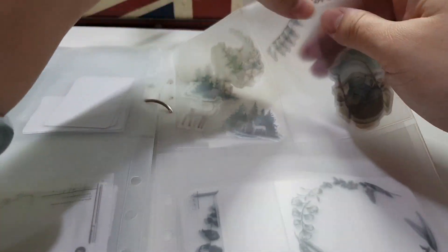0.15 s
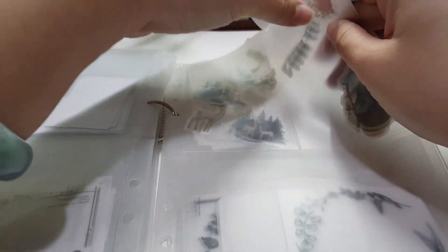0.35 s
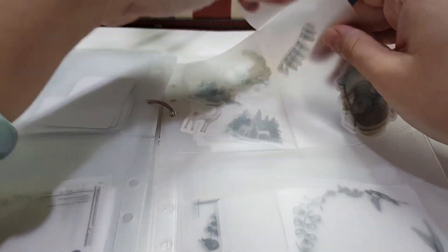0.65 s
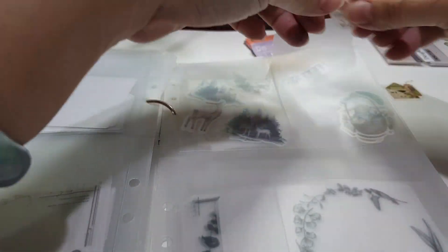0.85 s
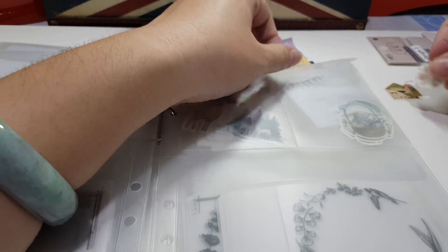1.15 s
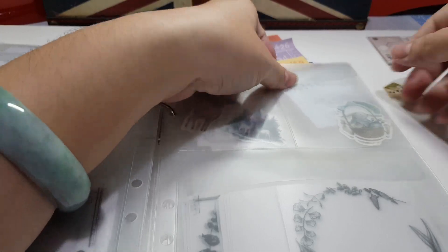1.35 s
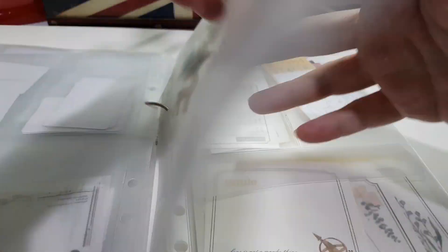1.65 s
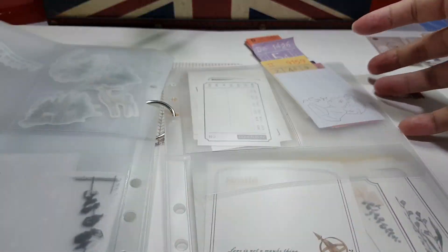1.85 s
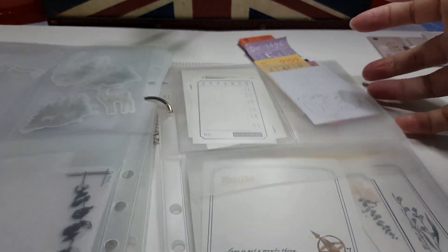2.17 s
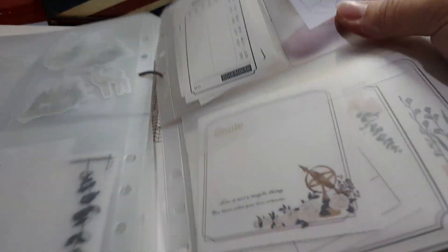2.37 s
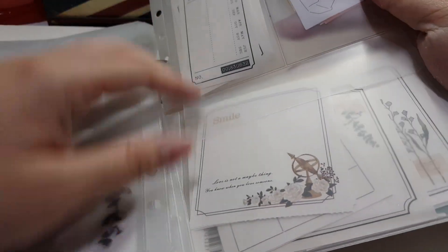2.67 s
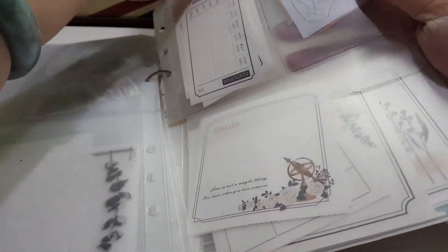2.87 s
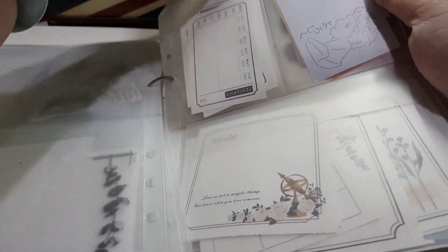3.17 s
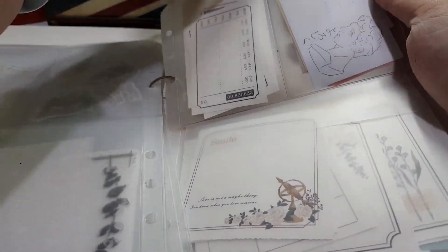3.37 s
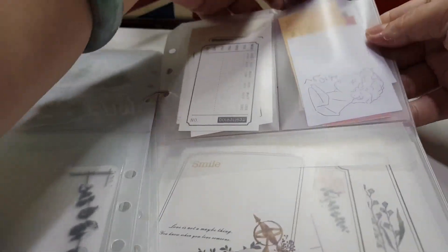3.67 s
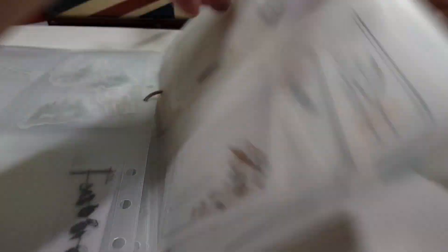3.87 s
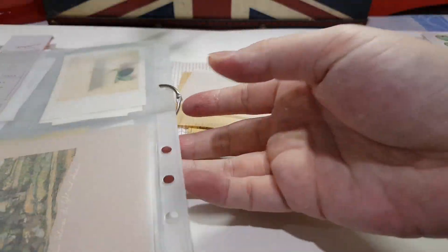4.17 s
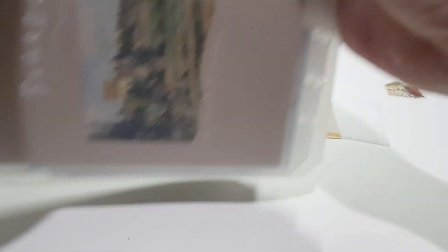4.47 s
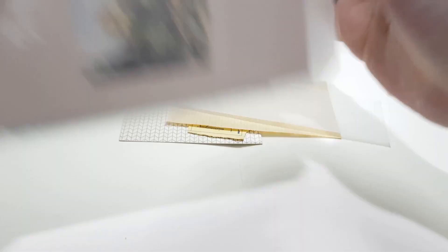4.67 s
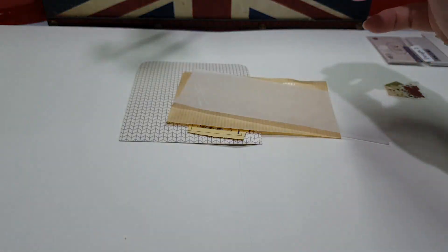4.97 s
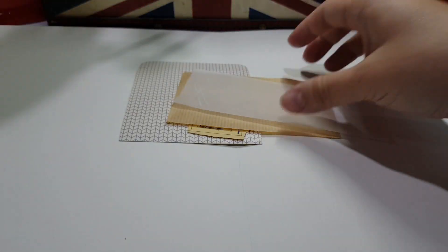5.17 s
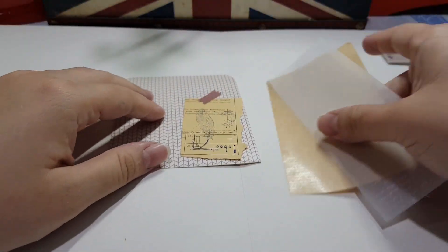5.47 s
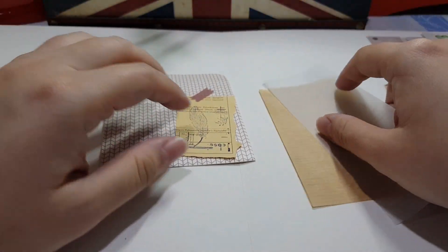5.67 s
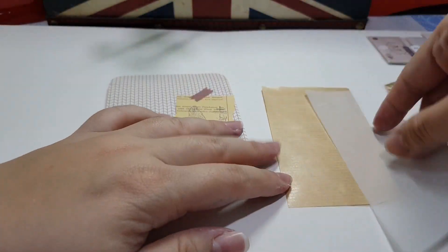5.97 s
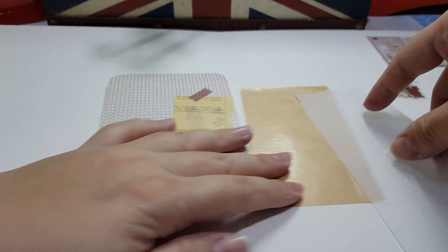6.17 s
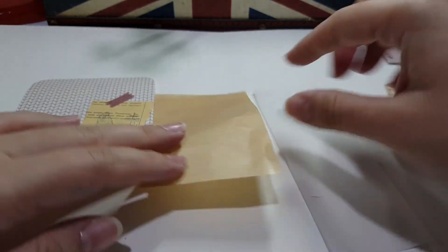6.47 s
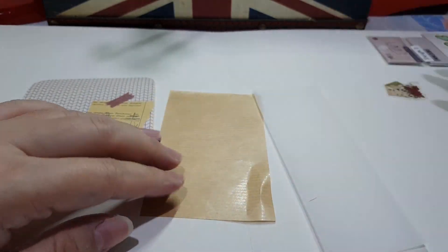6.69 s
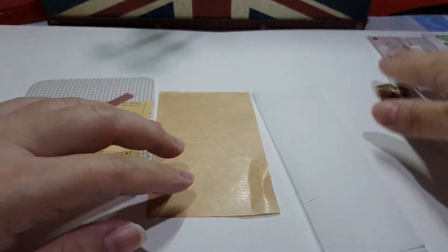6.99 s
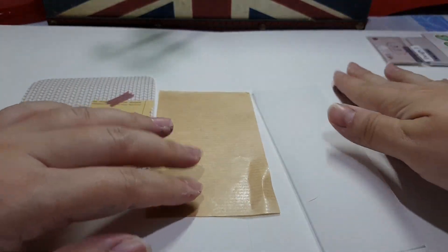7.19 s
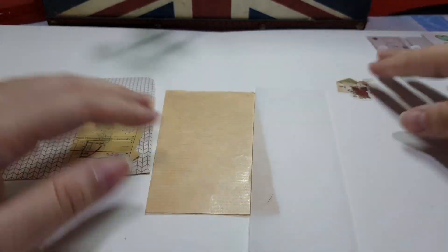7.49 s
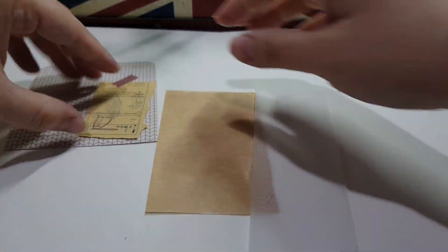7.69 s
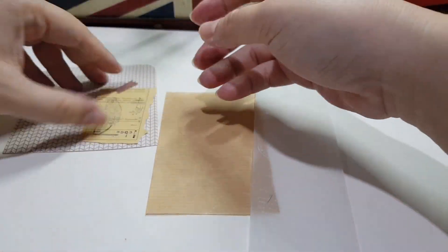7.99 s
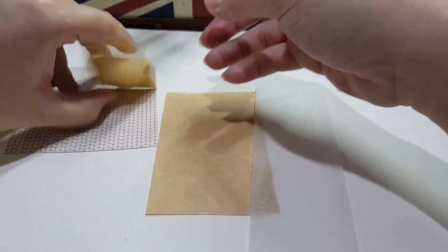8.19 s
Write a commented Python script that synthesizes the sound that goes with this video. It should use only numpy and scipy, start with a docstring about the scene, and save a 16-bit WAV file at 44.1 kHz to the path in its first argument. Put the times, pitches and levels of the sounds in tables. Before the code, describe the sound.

In a small quiet room, close stereo microphones catch hands fingering and turning plastic binder sleeves: crinkles, hollow sweeps and small snaps. The binder is set down with a sharp clack and light bump. Sticker papers then slide and flex with smooth hisses, a hand knocks the desk dully, and bright sharp crackles end it. A low hum pulses steadily beneath.

```python
"""At a desk in a small quiet room, hands leaf through the plastic sleeves of a ring binder,
lay it aside and slide sticker papers about. Noise and tiny random slips make the hisses and crackles.
Bent sheets swell until their stiff edges snap: a crack and a shiver, coloured by the sheet.
Once a hand knocks the desk, which judders: its modes ring as fading sine waves, with a scuff of noise.
Room noise lies underneath, and a low hum of wavering tones and filtered noise swells and sinks."""
import sys
import numpy as np
from scipy import signal
from scipy.fft import rfft, irfft
from scipy.io import wavfile
from scipy.ndimage import map_coordinates

SR = 44100
rng = np.random.default_rng(int(sys.argv[2]) if len(sys.argv) > 2 else 0)


def transcribe(u):
    """Save the signal u as a 16-bit wav file named by the first command-line argument.

    u: samples, shape (n,) or (channels, n), limited to [-1, 1]; the rate is SR.
    q: integer samples, one column per channel.
    """
    v = np.clip(np.atleast_2d(u).T, -1, 1)
    q = np.round(v * 32767).astype(np.int16)
    wavfile.write(sys.argv[1], SR, q)


N = 367794


def gain_of(db):
    """Turns decibels into amplitude."""
    return 10 ** (np.asarray(db) / 20)


def evened(x):
    """Scales a signal to an average strength (rms) of 1."""
    return x / np.sqrt(np.mean(x ** 2) + 1e-20)


def fading(t, t60):
    """Dies away by 60 dB in t60 seconds."""
    return 1000 ** (-t / t60)


def read(points, hz):
    """Reads a table of values over pitch, on a log-frequency axis."""
    f, value = np.transpose(points)
    return np.interp(np.log(hz + 1), np.log(f + 1), value)


def add(mix, s, sound):
    """Mixes a stereo sound in at time s."""
    part = mix[:, max(round(s * SR), 0):][:, :sound.shape[1]]
    part += sound[:, :part.shape[1]]


def wander(size, span):
    """Smooth random drift of rms about 1 that changes over about span points."""
    grid = np.arange(size) / max(span, 1)
    return 1.2 * np.interp(grid, np.arange(size + 2), rng.standard_normal(size + 2))


def band(x, low_hz, high_hz, order):
    """Keeps only what lies between two pitches."""
    return signal.sosfilt(signal.butter(order, [low_hz, high_hz], "band", fs=SR, output="sos"), x)


# How alike the left and right sounds are. Each row: pitch in Hz, likeness from 0 to 1.
LIKENESS = [(60, 1), (250, 0.49), (600, 0.11), (1200, 0.24), (3000, 0.011)]


def paired(z, hz):
    """Two microphones hear the bass alike and the treble differently."""
    same = np.clip(read(LIKENESS, hz), 0, 1)
    return np.array([z[0], same * z[0] + np.sqrt(1 - same ** 2) * z[1]])


def panned(db):
    """Left and right gains of equal total power; db is how much louder the left is."""
    sides = gain_of([[db / 2], [-db / 2]])
    return evened(sides)


def causal(gain):
    """Gives a spectrum the phase of a struck thing: sharp start, then ringing."""
    circle = np.log(np.maximum(np.r_[gain, gain[-2:0:-1]], 1e-6))
    phase = signal.hilbert(circle).imag[:len(gain)]
    return gain * np.exp(-1j * phase)


def flex(hz, centre_hz, octaves=0.6, bounce=0.1, bounce_s=0.000929, spacing_hz=260):
    """A bent sheet rings in one broad hump of modes; its echo off the desk ripples the hump."""
    hump = (1 + (np.log2((hz + 1) / centre_hz) / octaves) ** 2) ** -1.5
    uneven = evened(gain_of(2.1 * wander(len(hz), spacing_hz / hz[1])))  # random bumps along the hump
    echo = abs(1 + np.clip(bounce, 0, .6) * np.exp(-2j * np.pi * hz * bounce_s))
    return hump * uneven * echo


def crackle(size, per_s, spread_db):
    """Tiny slips of random size, with separate random signs at each microphone; rms near 1."""
    sizes = gain_of(spread_db * np.minimum(rng.exponential(1, size), 4))
    slips = (rng.random(size) < per_s / SR) * sizes
    return evened(slips * rng.choice([-1, 1], (2, size)))


def gritty(size, share, per_s):
    """Blends smooth noise with crackle; share is the crackle's part of the power, 0 to 1."""
    share = np.clip(share, 0, 1)
    smooth = np.sqrt(1 - share) * rng.standard_normal((2, size))
    return smooth + np.sqrt(share) * crackle(size, per_s, spread_db=3.5)


# Colour of skin and paper sliding. Each row: pitch in Hz, level in dB.
HISS = [(200, -16.5), (700, -19), (1500, -5.5), (3000, -4.5), (5000, -1), (8000, -3.5), (11500, -1.5),
        (15500, -9.5)]
# Colour of a whole sleeve moving over the desk. Each row: pitch in Hz, level in dB.
BODY = [(60, -17), (200, -10), (450, -10), (700, -9.5), (1100, -1), (2000, -11), (4000, -23), (9000, -57)]


def sheet_colour(hz, flex_db, body_db, flex_hz, octaves=0.6):
    """A sheet's flexing modes joined with the hollow body of its sleeve."""
    return np.hypot(gain_of(flex_db) * flex(hz, flex_hz, octaves), gain_of(body_db + read(BODY, hz)))


def stroke(speed, hiss_db, body_db, flex_db, flex_hz, pan_db, grit, crinkle, flutter_db, octaves):
    """Fine friction hisses; coarser slips drive the sheet's modes and the sleeve's body."""
    size = len(speed)
    hz = np.fft.rfftfreq(size, 1 / SR)
    fine = gritty(size, grit, per_s=2800)
    coarse = gritty(size, crinkle, per_s=1100)
    sheet = sheet_colour(hz, flex_db, body_db, flex_hz, octaves)
    z = rfft(fine) * gain_of(hiss_db + read(HISS, hz)) + rfft(coarse) * causal(sheet)
    flutter = gain_of(flutter_db * wander(size, .006 * SR))
    return irfft(paired(z, hz)) * speed * flutter * panned(pan_db)


def clock(length):
    """Sample times for a sound of at least this length, in whole blocks."""
    return np.arange(1024 * int(length * SR / 1024 + 2)) / SR


def arch(length, shape):
    """Speed of a hand that starts, glides and stops."""
    return np.sin(np.pi * np.minimum(clock(length) / length, 1)).clip(0) ** shape


# The hum swells at a steady pace; the swell just after the knock is turned down with the gain.
HUM_HZ = 46.86
FIRST_CREST_S, SWELL_PERIOD_S, CREST_DB = 0.4247, .838, -48.5
DUCKED_SWELL_S, DUCKED_SWELL_DB = 7.13, -9
# Faint tones of the hum that do not swell. Each row: pitch in Hz, level in dB.
TONES = [(101, -64), (185, -75), (237, -74.5), (288, -81), (339, -77), (403, -78.5), (458, -79.5)]


def hum(rumble=0.34, half_width_s=0.2325, trough_db=-66, balance_db=1.5):
    """A motor's low tone and the flutter around it swell together, under a few faint, wavering tones."""
    t = np.arange(N) / SR
    turn = 2 * np.pi * HUM_HZ * t + 0.465 * wander(N, .15 * SR)
    flutter = band(rng.standard_normal(N), 31, 58, order=3)
    crests = FIRST_CREST_S + SWELL_PERIOD_S * np.arange(N / SR / SWELL_PERIOD_S)
    ducked = abs(crests - DUCKED_SWELL_S) < SWELL_PERIOD_S / 2
    heights = gain_of(CREST_DB + DUCKED_SWELL_DB * ducked)
    swell = sum(height * np.exp(-abs((t - s) / half_width_s) ** 3) for s, height in zip(crests, heights))
    low = evened(evened(np.sin(turn)) + rumble * evened(flutter)) * (swell + gain_of(trough_db))
    buzz = np.zeros(N)
    for hz, db in TONES:
        wavering = t + 0.00083 * wander(N, .13 * SR)
        buzz += gain_of(db) * evened(np.sin(2 * np.pi * hz * wavering))
    return (low + buzz) * panned(balance_db)


# Colour of the room noise. Each row: pitch in Hz, level in dB.
AIR = [(20, -50), (45, -27), (75, -39), (110, -27), (145, -48), (180, -42), (240, -41), (420, -48),
       (650, -57), (1050, -54), (1700, -62), (2800, -82), (8000, -84), (15000, -88)]
# The recorder's automatic gain, typed as a curve: the room noise sinks after the knock and recovers.
# Each row: time in seconds, level change in dB.
AIR_LEVEL = [(0, -0.5), (6.7, -0.5), (6.95, -5.5), (7.55, -7), (7.9, 2.5), (8.34, 1)]


def air():
    """Dull, steady room noise: random hiss shaped to a dark colour, then turned down and up by the gain."""
    hz = np.fft.rfftfreq(N, 1 / SR)
    noise = irfft(paired(rfft(rng.standard_normal((2, N))), hz) * gain_of(read(AIR, hz)), N)
    return noise * gain_of(np.interp(np.arange(N) / SR, *np.transpose(AIR_LEVEL)))


# Fingers fidget with the sleeves between the grips.
# Each row: start in seconds, end in seconds, middle force of the touches in dB.
FIDGETS = [(0, 0.474, -61.5), (1.05, 1.2, -57.5), (3.18, 3.36, -62.5)]


def fidget(start, end, force_db, gap_s=.08, length=0.0455, low_hz=3000, high_hz=7500,
           spread_db=3, hiss_re_db=-16, body_re_db=11):
    """Light touches at loose intervals, each ringing a different small patch of plastic."""
    out = np.zeros((2, round((end - start + .3) * SR)))
    times = np.arange(0, end - start, gap_s)
    for s, (late, force, patch) in zip(times, rng.random((len(times), 3))):
        db = force_db + spread_db * (2 * force - 1)
        patch_hz = low_hz * (high_hz / low_hz) ** patch
        touch = stroke(arch(length, shape=0.82), db + hiss_re_db, db + body_re_db, db, patch_hz,
                       pan_db=1.17, grit=.3, crinkle=0.44, flutter_db=1.5, octaves=0.305)
        add(out, s + late * gap_s / 2, touch)
    return out


# At a firm grip: force, friction hiss and hollow body in dB.
FIRM_DB, FIRM_HISS_DB, FIRM_BODY_DB = -40, -44, -40
# Hiss and body follow the force by their own slopes, in dB per dB.
HISS_SLOPE, BODY_SLOPE = 1.425, 0.407
# Each rustle starts softly, then fades with a faint trail.
LEAD_S, LEAD_DB, GRIP_S = .025, -14.5, 0.0129
TRAIL_DB, TRAIL_S = -21, 0.0385
# A sleeve is gripped or crumpled. Each row: start of the grip in seconds, length of the grip in seconds,
# force in dB, middle pitch of the flexing in Hz, left over right in dB.
RUSTLES = [(0.133, 0.0375, -48.5, 5260, 2.5), (0.228, 0.0386, -63, 5140, 7),
           (0.511, 0.0174, -49, 4700, -2.5), (0.641, 0.0415, -54.5, 2880, 1),
           (0.705, 0.054, -40, 3350, 1.5), (0.775, 0.02855, -39.5, 2710, 0.5),
           (0.993, 0.0257, -41.5, 3900, -0.5), (1.276, 0.0347, -51, 3320, -2.5),
           (1.463, 0.065, -45.5, 4200, -2.5), (1.548, .08, -43, 2100, 2), (1.622, 0.059, -44, 2000, 2),
           (1.694, 0.0646, -42.5, 3330, 1), (1.782, 0.0391, -43, 2930, 5), (2.13, 0.0306, -55, 2400, 4.5),
           (2.187, 0.0362, -49.5, 2840, -1), (2.322, 0.036, -42.5, 2280, 0), (2.951, 0.063, -47.5, 3660, 0),
           (3.414, 0.042, -59.5, 6040, 0), (3.458, 0.0338, -59, 2860, 1), (3.67, 0.0248, -47.5, 2530, -0.5),
           (3.811, 0.0378, -55.5, 2570, 2), (3.938, 0.0445, -41, 2170, 1), (4.001, 0.0512, -39.5, 1960, 2),
           (4.089, 0.0488, -43, 2860, 3.5), (4.162, 0.078, -60.5, 3000, 4), (4.253, 0.063, -43, 1885, 4),
           (4.339, 0.084, -42, 1966, 2), (4.595, 0.0414, -38.5, 2950, 0.5), (4.638, 0.0937, -51, 3050, 2),
           (5.022, 0.0608, -40, 2260, 0.5), (5.278, 0.0172, -47.5, 2500, -0.5),
           (6.464, 0.0195, -43, 6160, -0.5), (6.554, 0.054, -47.5, 4500, 2),
           (6.667, 0.0386, -55, 2385, 1.5), (7.901, 0.0395, -52, 4200, 6), (7.945, 0.0352, -39, 3977, -0.5),
           (7.98, 0.0179, -32, 4500, 4), (8.252, 0.0323, -34, 4350, -0.5)]


def rustle(length, force_db, flex_hz, pan_db, octaves=0.718):
    """Soft start, grip and release; a harder grip is brighter, a light one mostly hollow."""
    t = clock(3 * length + .15) - LEAD_S  # the grip starts at 0
    held = np.maximum(t, 0)
    speed = np.minimum(held / GRIP_S, 1) * np.exp(-(held / length) ** 2.2)
    lead = gain_of(LEAD_DB) * (1 + t / LEAD_S) ** 2
    trail = gain_of(TRAIL_DB) * np.exp(-held / TRAIL_S)
    skirt = np.where(t < 0, lead, trail)
    extra_db = force_db - FIRM_DB
    hiss_db = FIRM_HISS_DB + HISS_SLOPE * extra_db
    body_db = FIRM_BODY_DB + BODY_SLOPE * extra_db
    return stroke(np.hypot(speed, skirt), hiss_db, body_db, force_db, flex_hz, pan_db,
                  grit=.16, crinkle=0.32, flutter_db=2.0, octaves=octaves)


# A whole sleeve sweeps over the desk.
# Each row: start in seconds, length in seconds, body level in dB, left over right in dB.
SWEEPS = [(.22, 0.0507, -38.5, 2), (.505, 0.0801, -39.5, 3), (1.45, 0.0998, -38.5, 0),
          (1.63, .13, -33, 3.5), (4.59, 0.0512, -26, 0), (5.04, 0.1091, -32, 3)]


def sweep(length, body_db, pan_db, hiss_re_db=-33, flex_re_db=-15, flex_hz=2300):
    """A moving sleeve sounds mostly with its hollow body."""
    return stroke(arch(length, shape=0.692), body_db + hiss_re_db, body_db, body_db + flex_re_db,
                  flex_hz, pan_db, grit=.12, crinkle=0.33, flutter_db=2.5, octaves=0.65)


# A tauter edge snaps with more fizz: hiss against flex at FIZZ_HZ, and its rise with pitch.
FIZZ_HZ, FIZZ_DB, FIZZ_DB_PER_OCTAVE = 4080, -12, 16.5
# Sheet edges that snap or tap. Each row: start in seconds, time to fade by 60 dB in seconds,
# sheet flex in dB, hollow body in dB, middle pitch of the flexing in Hz, left over right in dB.
SNAPS = [(.707, 0.0315, -19, -11, 3300, 7), (.997, 0.016, -16, -13, 4520, 2.5),
         (1.279, 0.0233, -23, -15.5, 3900, 1.5), (1.4773, 0.01, -4, 0, 3730, 1),
         (1.4947, 0.0072, -8.5, -16.5, 3880, -1), (1.5141, 0.0075, -13.5, -17.5, 1800, 6.5),
         (1.5764, 0.0108, -13, -26.5, 5780, -2.5), (1.6676, 0.02, -18.5, -3, 4260, 10),
         (1.707, 0.033, -11.5, -7, 5940, -1.5), (1.9699, 0.041, -23.5, -16.5, 2625, -2.5),
         (2.4771, 0.0223, -20.5, -12, 4200, 7), (4.0154, 0.0092, -6, -18.5, 2710, 7.5),
         (4.6019, 0.0082, 1.5, -6, 2736, 22), (4.6214, 0.0118, -3.5, -3, 3000, 9),
         (4.7444, 0.0147, -9, -4.5, 2030, 5), (4.7618, 0.0063, -12, -9, 2065, 5.5),
         (5.0352, 0.0122, -5.5, -7.5, 2290, 3), (5.274, 0.035, -13, -27, 2300, -2),
         (5.3688, 0.015, -10.5, -30.5, 5000, -2), (5.459, 0.038, -7, -29, 5400, -1),
         (6.578, 0.0325, -10, -36, 6450, 0), (6.5959, .009, -14.5, -36.5, 7067, 5),
         (7.952, .02, -11.5, -27, 3990, -0.5), (7.996, 0.0255, 4.5, -5.5, 4300, 3.5),
         (8.283, 0.0304, 9.5, 7.5, 4566, 3)]


def snap(t60, flex_db, body_db, flex_hz, pan_db, crack_share=0.15, size=4096):
    """An edge lets go: one crack and a brief shiver of the sheet."""
    t, hz = np.arange(size) / SR, np.fft.rfftfreq(size, 1 / SR)
    hiss_db = flex_db + FIZZ_DB + FIZZ_DB_PER_OCTAVE * np.log2(flex_hz / FIZZ_HZ)
    shiver = rng.standard_normal((2, size)) * fading(t, t60)
    shiver /= np.linalg.norm(shiver, axis=1, keepdims=True)
    crack = 1 / (1 + 1j * hz / 7000)  # the fold takes a moment to flip
    share = np.clip(crack_share, 0, 1)
    blow = np.sqrt(share) * crack + np.sqrt(1 - share) * rfft(shiver)
    sheet = sheet_colour(hz, flex_db, body_db, flex_hz)
    colour = causal(np.hypot(sheet, gain_of(hiss_db + read(HISS, hz))))
    return irfft(paired(blow, hz) * colour) * (1 - t / t[-1]) * panned(pan_db)


# Skin or paper slides flat across a sheet. Each row: start in seconds, length in seconds,
# hiss level in dB, middle pitch of the flexing in Hz, left over right in dB.
SLIDES = [(1.09, 0.1332, -63, 4000, -5.5), (1.83, 0.1205, -59.5, 5000, 1), (2.33, 0.284, -59.5, 2980, 3),
          (2.535, 0.1202, -51, 11000, 4.5), (2.74, 0.058, -66, 11500, 6.5), (2.83, 0.097, -59, 6640, 2),
          (3.535, 0.1083, -52.5, 2800, 2), (3.87, 0.157, -54, 4300, -2), (4.44, 0.1404, -41, 3020, 1),
          (4.782, 0.051, -44.5, 3180, 2), (5.29, 0.2556, -43, 5400, 1), (5.4, 0.2997, -61, 5500, 0.5),
          (5.74, 0.53, -65, 6500, -2.5), (6.035, 0.0598, -51, 7200, 1), (6.11, 0.0513, -51.5, 8100, 1.5),
          (6.205, 0.2096, -44, 3570, 1.5), (7.305, 0.0638, -58, 9040, 0), (7.35, 0.0792, -57, 10400, 0.5),
          (7.625, 0.1301, -51.5, 2000, 2.5)]


def slide(length, hiss_db, flex_hz, pan_db, body_re_db=-7, flex_re_db=-5):
    """A flat slide is nearly all smooth hiss."""
    return stroke(arch(length, shape=1.37), hiss_db, hiss_db + body_re_db, hiss_db + flex_re_db,
                  flex_hz, pan_db, grit=.1, crinkle=0.2, flutter_db=1.5, octaves=0.95)


# A thin high ringing when the binder is moved.
# Each row: start in seconds, length in seconds, level in dB.
RINGING = [(4.085, 0.143, -62), (4.38, 0.1, -61.5), (4.495, 0.087, -52), (4.785, 0.0865, -61)]


def ringing(length, db, pitch_hz=14770, width_hz=130):
    """A narrow, fuzzy whistle that swells and fades."""
    t = np.arange(round(length * SR)) / SR
    turn = 2 * np.pi * pitch_hz * t
    span = SR / width_hz
    sides = [wander(len(t), span) * np.cos(turn) + wander(len(t), span) * np.sin(turn) for side in range(2)]
    return gain_of(db) * np.array(sides) * np.hanning(len(t))


# Ways the desk top rings. Each row: pitch in Hz, level in dB, time to fade by 60 dB in seconds.
DESK = [(116, -20.5, .12), (227.3, -8, 0.098), (252.4, 0.5, 0.081), (315.9, -14, 0.14), (345.3, -4, 0.1),
        (417.2, -17.5, 0.066), (510.7, -10.5, 0.06)]
# Colour of the scuff in each bump. Each row: pitch in Hz, level in dB.
SCUFF = [(60, -12.5), (115, 5), (165, -7.5), (220, 17.5), (400, 15), (630, -4.5), (830, 0.5), (990, 13),
         (1250, -2.5), (2200, -9), (4000, -21), (7000, -33.5), (12000, -48.5)]
# Bumps on the desk, as the binder lands and a hand knocks.
# Each row: start in seconds, strength in dB, scuff level in dB.
BUMPS = [(4.602, -42, -18), (4.621, -36.5, -13.5), (6.811, -25.5, 2.5), (6.8226, -29, 1.5),
         (6.8327, -19, -2), (6.8474, -23.5, 4.5), (6.8559, -17.5, -3)]


def bump(strength_db, scuff_db, scuff_t60=0.109, size=12288):
    """One cushioned bump rings the desk's modes while skin scuffs the top."""
    t, hz = np.arange(size) / SR, np.fft.rfftfreq(size, 1 / SR)
    ring = sum(gain_of(db) * fading(t, t60) * np.sin(2 * np.pi * f * t) for f, db, t60 in DESK)
    soft = band(ring, 105, 500, order=4)
    rub = rng.standard_normal((2, size)) * np.minimum(t / .006, 1) * fading(t, scuff_t60)
    rub /= np.linalg.norm(rub[0])
    scuff = irfft(paired(rfft(rub), hz) * causal(gain_of(read(SCUFF, hz))))
    return gain_of(strength_db) * soft + gain_of(scuff_db) * scuff


# How far a bend swells, how fast it fades once let go (as a share of its length), and how far it climbs.
BEND_SWELL_DB, BEND_RELEASE_SHARE, BEND_CLIMB_OCTAVES = 19.5, 0.206, .18
# A sticker sheet is bent further and further, then let go. Each row: start in seconds,
# seconds until let go, final level in dB, final middle pitch of the flexing in Hz, left over right in dB.
BENDS = [(5.268, 0.0288, -33.5, 2530, -0.5), (5.68, 0.3103, -54.5, 5550, 7.5),
         (6.36, 0.081, -54.5, 6720, 2), (6.52, .075, -37.5, 3270, 5), (7.79, 0.194, -48.5, 3240, 4),
         (8.09, 0.17, -41, 3240, 4)]


def bend(length, flex_db, flex_hz, pan_db, hiss_re_db=-15, body_re_db=-9):
    """A band of the sheet swells and climbs as it is bent taut, and fades once it is let go."""
    done = clock(2 * length) / length  # reaches 1 when let go
    slack, after = np.maximum(1 - done, 0), np.maximum(done - 1, 0)
    swell = np.minimum(10 * done, 1) * gain_of(-BEND_SWELL_DB * slack)
    speed = swell * np.exp(-after / BEND_RELEASE_SHARE)
    taut = stroke(np.ones(len(done)), flex_db + hiss_re_db, flex_db + body_re_db, flex_db, flex_hz, pan_db,
                  grit=.25, crinkle=0.47, flutter_db=3.5, octaves=0.538)
    # playing the taut sound slower at first lowers its pitch
    slowed = np.cumsum(2 ** (-BEND_CLIMB_OCTAVES * slack))
    return speed * np.array([map_coordinates(side, [slowed]) for side in taut])


def room(x, t60=0.1191, wet_db=-17, dull_hz=6000):
    """A short, dull tail from the desk top and the near walls."""
    t = np.arange(SR // 2) / SR
    taps = rng.standard_normal((2, len(t))) * fading(t, t60) * (t > .002)
    tail = signal.lfilter(*signal.butter(1, min(dull_hz, SR / 3), fs=SR), taps)
    tail /= np.linalg.norm(tail[0])
    return gain_of(wet_db) * signal.fftconvolve(x, tail, axes=1)[:, :N]


def scene():
    """All the handling, in the room, over hum and air."""
    hands = np.zeros((2, N))
    for start, end, force_db in FIDGETS:
        add(hands, start, fidget(start, end, force_db))
    for s, *row in RUSTLES:
        add(hands, s - LEAD_S, rustle(*row))
    sources = ((SWEEPS, sweep), (SNAPS, snap), (SLIDES, slide),
               (RINGING, ringing), (BUMPS, bump), (BENDS, bend))
    for table, source in sources:
        for s, *row in table:
            add(hands, s, source(*row))
    return hands + room(hands) + hum() + air()


EDGE_HZ = 15850


def record(dry):
    """The recorder's band limit: a steep filter removes what lies above EDGE_HZ."""
    lowpass = signal.firwin(511, EDGE_HZ, window=("kaiser", 9), fs=SR)
    return signal.oaconvolve(dry, lowpass[None], "same")


dry = scene()
out = record(dry)
transcribe(out)
```